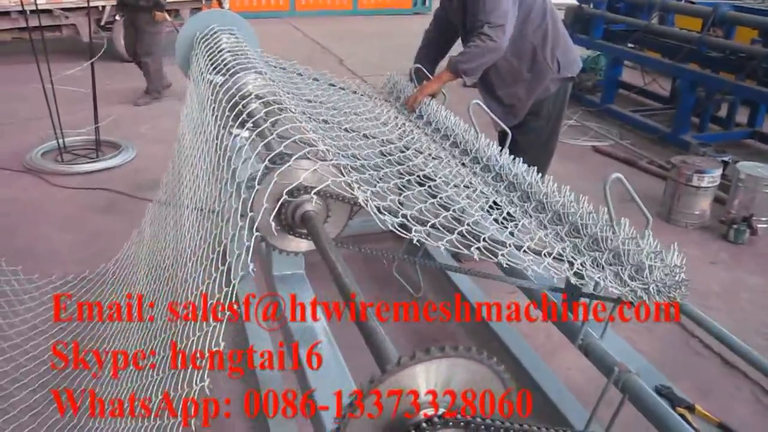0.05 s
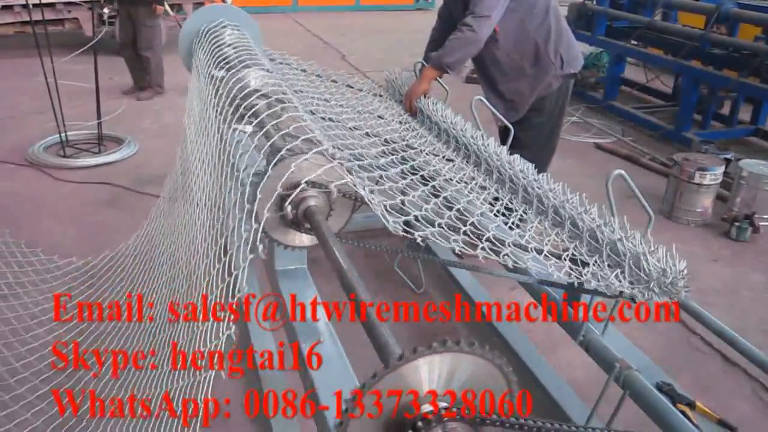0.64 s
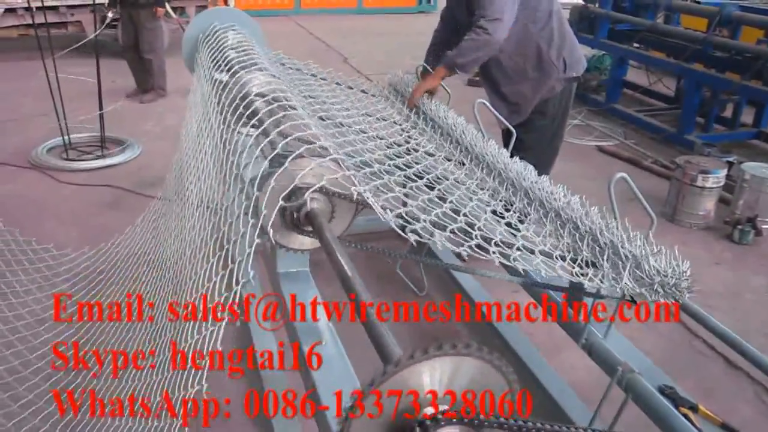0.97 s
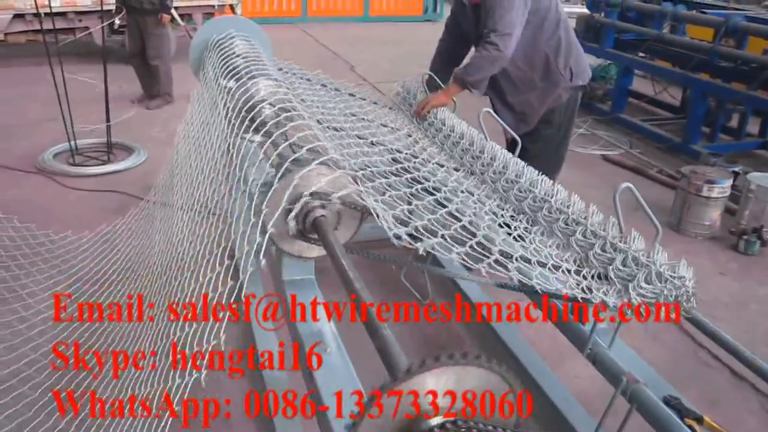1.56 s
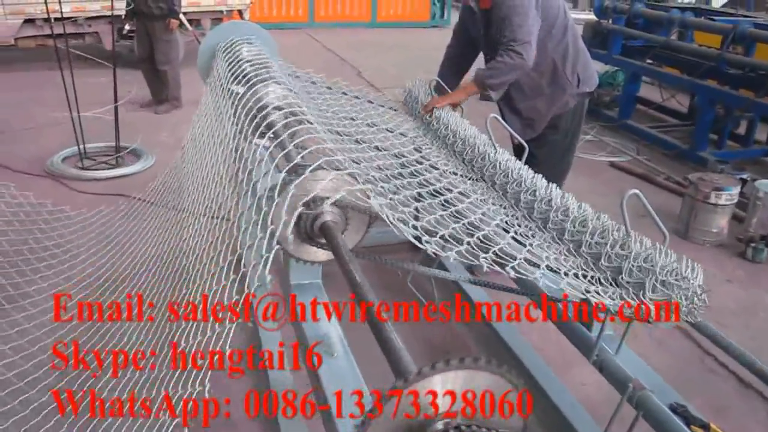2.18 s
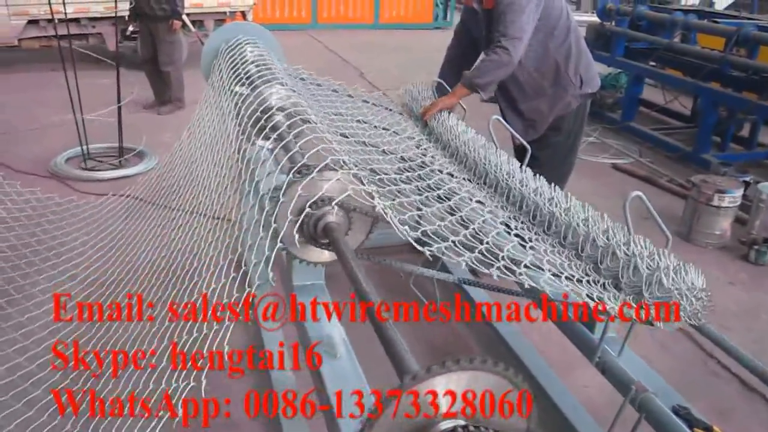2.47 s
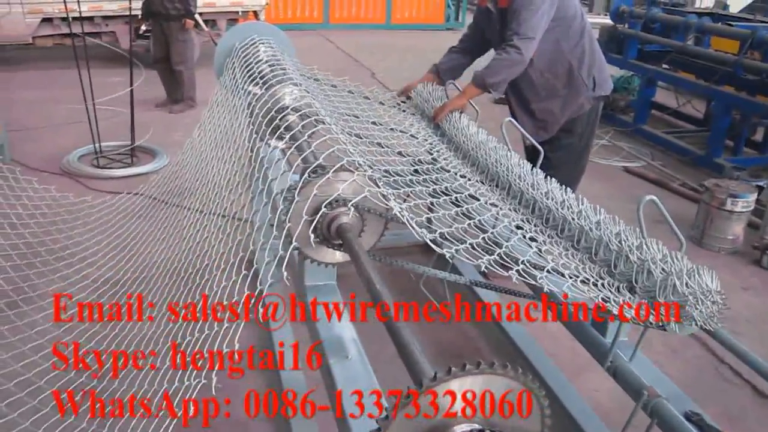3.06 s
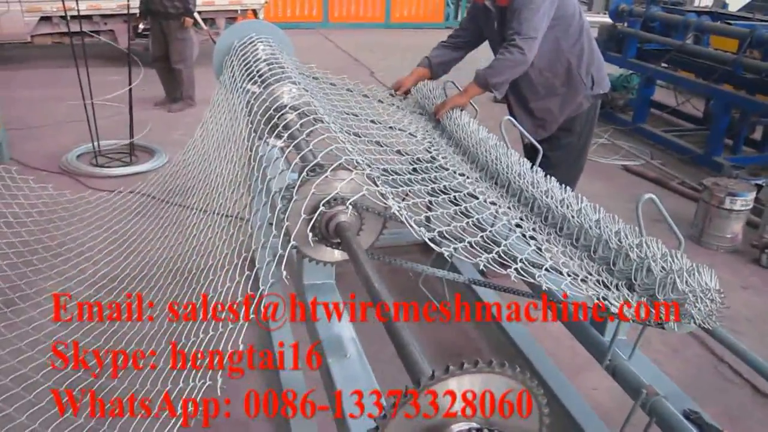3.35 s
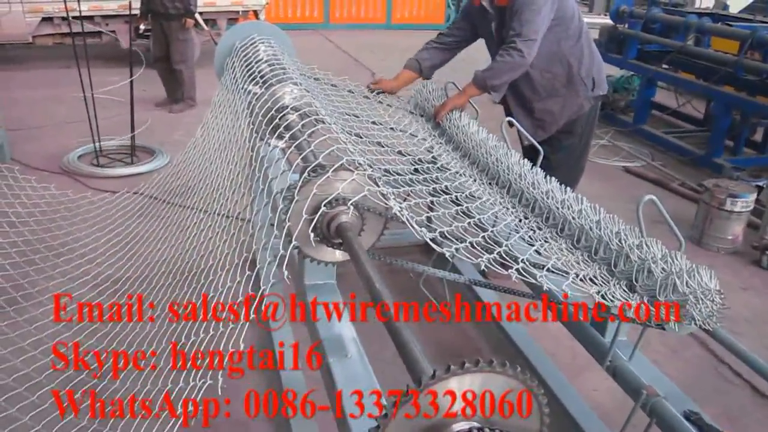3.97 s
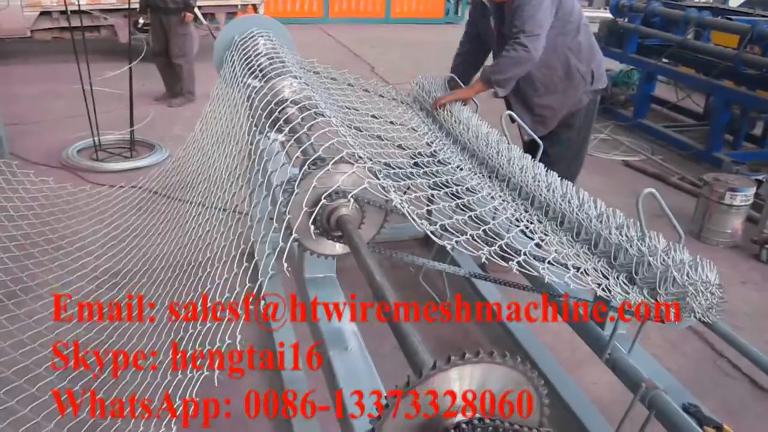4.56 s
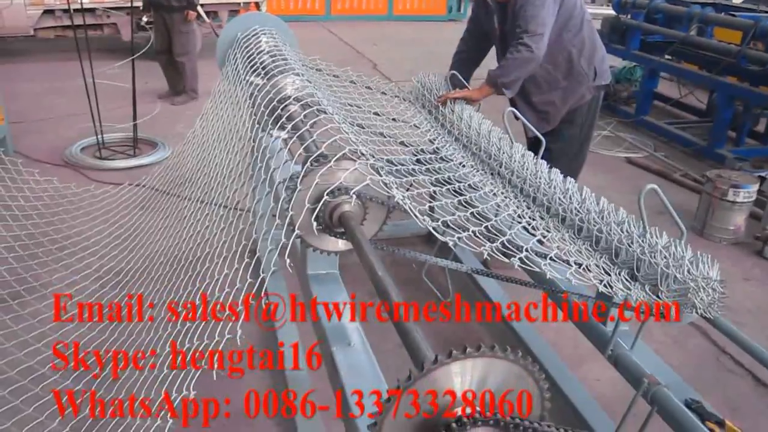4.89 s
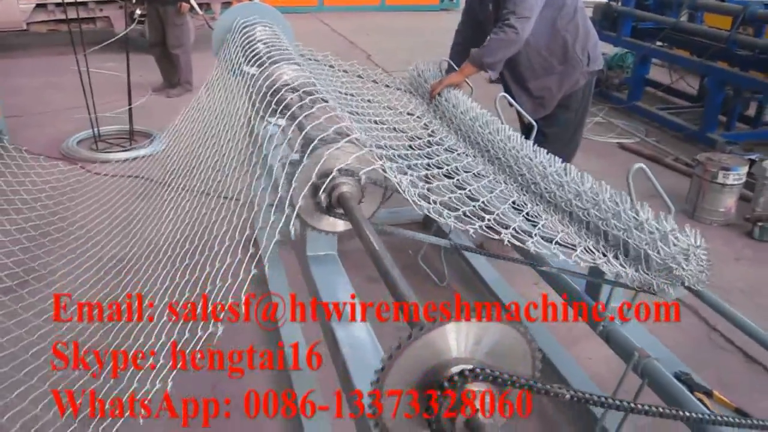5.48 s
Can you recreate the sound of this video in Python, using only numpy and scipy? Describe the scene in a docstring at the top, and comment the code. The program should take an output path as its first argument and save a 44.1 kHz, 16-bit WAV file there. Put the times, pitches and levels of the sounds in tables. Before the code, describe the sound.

A chain-link mesh machine runs close by in a workshop, its steelwork slightly to the right. Throughout, a motor hum throbs about three times a second over a low drone and a hoarse, repeating rub. Wire scrapes and hisses from the start, with scattered light clacks. Around 0.4 to 0.6 seconds the mesh clashes, rattling and ringing with dull knocks. A drive whine enters at about 0.6 seconds and fades after 1.5. From 1.5 to 1.8 seconds the wire scrapes hard again, crackling, rasping and clashing, and the steel frame rings several times between 1.7 and 2.4 seconds. From about 2 seconds, sharp, bright steel clacks dominate in an even rhythm, six or seven a second, some with a quick rebound, while the scraping drops to a light hiss. A short rasp comes at 4.6 seconds, and the machine is still running at 5.5.

```python
"""Chain-link fence machine at work

Motors hum, the frame drones and a sliding part rubs, in a pattern that returns with each stroke.
Steel parts clack about twice a stroke. For two seconds wire scrapes hard through the machine,
crackling and rasping, while the mesh clashes and sets the steel frame ringing.
The camera stands close by in the workshop, a little to one side."""
import sys
import numpy as np
from scipy import signal
from scipy.fft import rfft, irfft, next_fast_len
from scipy.io import wavfile
from scipy.ndimage import uniform_filter1d, map_coordinates

SR = 44100
rng = np.random.default_rng(int(sys.argv[2]) if len(sys.argv) > 2 else 0)


def bounce(signal):
    """Save signal as a 16-bit WAV file at the path given by the first command-line argument."""
    frames = np.transpose(np.atleast_2d(signal))
    limited = np.clip(frames, -1, 1)
    pcm = np.round(limited * 32767).astype(np.int16)
    wavfile.write(sys.argv[1], SR, pcm)


N = 243873
STROKE_HZ = 10 / 3

# how hard the machine works, driving hum, drone and rub: time_s, load_db
MACHINE_LOAD = [(0, -25), (.11, -26.5), (.24, -26), (.5, -25.5), (.85, -22.5), (1.42, -21), (1.7, -27),
                (1.82, -33), (2.05, -27.5), (2.3, -25.5), (2.8, -30), (3.4, -27), (3.9, -26), (4.35, -22.5),
                (4.58, -27), (4.95, -24.5), (5.15, -26), (5.53, -23)]
# how hard the wire slides: time_s, scrape_db, hiss_db
WIRE_FEED = [(0, -33.5, -44.5), (.28, -36.5, -56), (.37, -30.5, -40), (.58, -23, -44), (.82, -27.5, -43.5),
             (1.05, -27.5, -38.5), (1.46, -28, -38.5), (1.58, -23.5, -44), (1.648, -25.5, -42),
             (1.73, -26.5, -43), (1.84, -35, -46.5), (2.04, -27, -42), (2.36, -32.5, -39),
             (2.7, -39, -47.5), (3.3, -40.5, -49), (4.25, -38, -41), (4.7, -39.5, -45), (5.13, -36.5, -41),
             (5.53, -29, -39)]


def amp(db):
    """Decibels to gain."""
    return 10 ** (np.asarray(db) / 20)


def unit(x):
    """x at rms 1."""
    return x / np.sqrt(np.mean(x ** 2) + 1e-20)


def along(points, hz):
    """Read a curve of (frequency, value) points on a log frequency axis."""
    freqs, values = np.transpose(points)
    return np.interp(np.log(hz + 1), np.log(freqs + 1), values)


def clock():
    """The time of each sample in seconds."""
    return np.arange(N) / SR


def curves(rows):
    """One automation curve for each column after the time."""
    times, *columns = np.transpose(rows)
    return [np.interp(clock(), times, column) for column in columns]


def wobble(rate):
    """A smooth random curve, rate knots a second."""
    return map_coordinates(rng.standard_normal(int(N * rate / SR) + 4), [clock() * rate])


def stroke_wobble(count):
    """A smooth random curve of count knots that is the same in every stroke."""
    position = clock() * STROKE_HZ % 1 * count
    return map_coordinates(rng.standard_normal(count), [position], mode="grid-wrap")


def swell(peak_s, hz=STROKE_HZ):
    """A regular swing between -1 and 1 with a peak at peak_s."""
    return np.cos(2 * np.pi * hz * (clock() - peak_s))


def filtered(x, response):
    """x through a frequency response."""
    size = next_fast_len(N + SR // 2)
    return irfft(rfft(x, size) * response(np.fft.rfftfreq(size, 1 / SR)), size)[..., :N]


def coloured(x, spectrum):
    """x through an EQ curve, at rms 1."""
    return unit(filtered(x, lambda hz: amp(along(spectrum, hz))))


def stereo_noise(lag_ms):
    """White noise: the direct part reaches the right side later, the room's part is diffuse."""
    # direct sound's part of the power: freq_hz, share
    direct_share = [(25, 1), (120, 1), (400, 1), (700, 0.96), (1300, 1), (2600, .62), (5000, 0.54),
                    (10000, 0.48), (15000, .3)]
    direct, room = rng.standard_normal(N), rng.standard_normal((2, N))
    share = lambda hz: np.clip(along(direct_share, hz), 0, 1)
    delay = lambda hz: np.exp(np.array([[1j], [-1j]]) * np.pi * hz * lag_ms / 1000)
    near = filtered(direct, lambda hz: np.sqrt(share(hz)) * delay(hz))
    return near + filtered(room, lambda hz: np.sqrt(1 - share(hz)))


def cyclic(x, share):
    """Noise x with a share of its power repeating exactly from stroke to stroke."""
    looped = x[:, np.arange(N) % round(SR / STROKE_HZ)]
    return np.sqrt(share) * looped + np.sqrt(1 - share) * np.roll(x, N // 2, axis=1)


def patchy(x, depth_db, bins):
    """x at rms 1, its colour shifting in patches every few hundredths of a second."""
    spectra = signal.stft(x, nperseg=512)[2]
    patches = uniform_filter1d(rng.standard_normal(spectra.shape[1:]), bins, axis=0)
    patches = uniform_filter1d(patches, size=6, axis=1)
    gain = amp(depth_db * np.clip(unit(patches), -2, 2))
    return unit(signal.istft(spectra * gain, nperseg=512)[1][:, :N])


def blow(peak_s, rise_s, t60, ring_db, ring_t60):
    """Envelope of a contact: grinds up to its peak, drops, and leaves a weaker ring."""
    first, last = max(0, int((peak_s - .05) * SR)), min(N, int((peak_s + .4) * SR))
    t = np.arange(first, last) / SR - peak_s
    after, ring = np.maximum(t, 0), min(amp(ring_db) ** 2, 1)
    attack = amp(-10 * (np.minimum(t, 0) / max(rise_s, 1e-4)) ** 2)
    fall = np.sqrt((1 - ring) * amp(-120 * after / t60) + ring * amp(-120 * after / ring_t60))
    return np.pad(attack * fall, (first, N - last))


def pings(times, level_db, low_hz, high_hz, t60, spread_db):
    """Short lengths of wire ring, each with its own pitch, strength and stereo phase."""
    pitch, strength, left_phase, offset = rng.random((len(times), 4)).T
    hz = low_hz * (high_hz / low_hz) ** pitch
    t = np.arange(SR // 10) / SR
    start_db = level_db + spread_db * (strength - 1)
    envelope = amp(start_db[:, None] - 60 * t / t60) * (1 - np.exp(-t / .0004))
    where = (np.round(times * SR).astype(int)[:, None] + np.arange(len(t))).ravel()
    sides = [envelope * np.sin(2 * np.pi * (hz[:, None] * t + phase[:, None]))
             for phase in (left_phase, left_phase + offset * hz / high_hz)]
    return np.array([np.bincount(where, side.ravel(), N)[:N] for side in sides])


def motor_hum():
    """Mains hum follows the load, throbs and flutters; moving parts sway it with each stroke."""
    # main hum tones, throbbing once (slow) and twice (fast) a stroke:
    # pitch_hz, level_db re load, slow_depth, slow_peak_s, fast_depth, fast_peak_s
    hum_tones = [(400, -1, 0.27, 0.16, 0.29, 0.096), (200, -8, 0.23, 0.2, 0.29, 0.067)]
    # brief surges and sags in every stroke: offset_s, gain_db, width_s
    surges = [(.102, 1.5, .008), (.155, 2, .008), (.18, -3, .009), (.244, 3.5, .009)]
    # weaker hum tones and how the stroke moves them: pitch_hz, level_db, swing_rad, swell_db
    overtones = [(57, -54, .3, 0), (108.6, -45, .3, 0), (320, -46, .2, 0), (536.7, -49, .5, 0),
                 (600, -52, .4, 0), (800, -43, .5, -2.5), (1006.7, -44.5, 2.6, 4.5), (1200, -49, .6, -1)]
    t = clock()
    load_db, = curves(MACHINE_LOAD)
    sway_rad = .28 * swell(peak_s=.07, hz=2 * STROKE_HZ) + .34 * swell(peak_s=.248)
    sway_rad += .12 * stroke_wobble(count=16) + .06 * wobble(18)
    stereo_rad = .014 * np.array([[1], [-1]])
    flutter = .17 * swell(peak_s=.023, hz=7 * STROKE_HZ)
    stroke_s = t % (1 / STROKE_HZ)
    surge_db = sum(db * np.exp(-((stroke_s - s) / width) ** 2) for s, db, width in surges)
    hum, gains = np.zeros((2, N)), []
    for hz, db, slow, slow_s, fast, fast_s in hum_tones:
        rough_db = .9 * (stroke_wobble(count=30) + wobble(22))
        throb = 1 + slow * swell(slow_s) + fast * swell(fast_s, 2 * STROKE_HZ) + flutter
        gain = amp(load_db + db + surge_db + rough_db) * np.maximum(throb, .2)
        hum += gain * np.sin(2 * np.pi * hz * t + sway_rad + stereo_rad)
        gains.append(gain)
    lead_db = 20 * np.log10(gains[0])
    follow_db = .5 * (lead_db - lead_db.mean())  # the weaker tones ride on the loudest
    stroke = swell(peak_s=.11)
    for hz, db, swing_rad, swell_db in overtones:
        phase = 2 * np.pi * (hz * t + rng.random()) + swing_rad * stroke + .35 * stroke_wobble(count=22)
        rough_db = 2.2 * stroke_wobble(count=24) + 1.8 * wobble(8)
        hum += amp(db + swell_db * stroke + follow_db + rough_db) * np.sin(phase)
    return np.sqrt(2) * hum


def frame_drone():
    """The frame drones with the load and the wire's drag, alike in each stroke, over a rumble."""
    # the frame's low-mid resonance: freq_hz, gain_db
    drone_eq = [(70, -55), (120, -31), (155, 2.5), (250, 3), (430, 7.5), (560, -2.5), (950, -0.5),
                (1400, -14), (3000, -14), (8000, -26.5)]
    # the low end under it: freq_hz, gain_db
    rumble_eq = [(20, -28), (38, -7), (50, -7), (66, -1.5), (80, -15), (95, -12), (112, -2), (140, -1.5),
                 (200, -47), (400, -49)]
    # the rumble's rise and fall: time_s, level_db
    rumble_levels = [(0, -38), (.35, -49), (.93, -34), (1.55, -42.5), (3.3, -49), (4.3, -46.5), (4.7, -40),
                     (5.2, -49), (5.4, -37)]
    load_db, = curves(MACHINE_LOAD)
    scrape_db, _ = curves(WIRE_FEED)
    rumble_db, = curves(rumble_levels)
    drone_db = -31.5 + .96 * (load_db - load_db.mean()) + .26 * (scrape_db - scrape_db.mean())
    drone_db += .35 * swell(peak_s=.13)
    drone = amp(drone_db) * coloured(cyclic(stereo_noise(lag_ms=.028), share=.8), drone_eq)
    rumble = amp(rumble_db + 1.7 * wobble(8.3)) * coloured(stereo_noise(lag_ms=.01), rumble_eq)
    return drone + rumble


def rubbing():
    """A sliding part rubs once a stroke, much the same each time, louder under load."""
    # a narrow, hoarse band of friction: freq_hz, gain_db
    rub_eq = [(600, -23), (850, -10), (950, 6.5), (1040, 2.5), (1130, 1), (1250, 5), (1450, -18),
              (2200, -44)]
    load_db, = curves(MACHINE_LOAD)
    rub_db = -39.5 + 1.17 * (load_db - load_db.mean()) + 2.5 * swell(peak_s=.12)
    return amp(rub_db) * coloured(cyclic(stereo_noise(lag_ms=.026), share=.65), rub_eq)


def sliding_wire():
    """Wire catches in countless tiny slips: it scrapes, hisses and sizzles, and links jingle."""
    # coarse midrange scrape: freq_hz, gain_db
    scrape_eq = [(200, -14), (450, -5.5), (700, 0), (1200, -1.5), (1900, 0.5), (2700, -4.5), (4000, -9.5),
                 (5500, -15), (7500, -20), (10000, -20.5), (16000, -55)]
    # gritty treble hiss: freq_hz, gain_db
    hiss_eq = [(1500, -19), (3500, 8), (5500, 5), (7500, -0.5), (9500, -0.5), (11300, 0.5), (13000, -9),
               (15000, -34), (16000, -32)]
    # top-end sizzle: freq_hz, gain_db
    sizzle_eq = [(5000, -25), (8500, -12), (10000, 0), (11500, 3), (12500, -1.5), (14500, -13),
                 (15500, -26)]
    scrape_db, hiss_db = curves(WIRE_FEED)
    slips = patchy(stereo_noise(lag_ms=.075), depth_db=2.2, bins=2) * amp(.36 * wobble(400))
    scrape = amp(scrape_db + 2.5) * coloured(slips, scrape_eq)
    grit = amp(.61 * wobble(900) + 2.1 * wobble(70))
    fine_slips = patchy(stereo_noise(lag_ms=.11), depth_db=5.5, bins=2) * grit
    hiss = amp(hiss_db + 6) * coloured(fine_slips, hiss_eq)
    slack_db = np.minimum(scrape_db + 24, 0)  # ducks sizzle and jingle unless the wire runs hard
    sizzle = amp(hiss_db + slack_db + 8.5) * coloured(stereo_noise(lag_ms=.092) * grit, sizzle_eq)
    touches = rng.integers(N, size=700)
    touch_db = (scrape_db + slack_db)[touches] + 2
    jingle = pings(touches / SR, touch_db, low_hz=1000, high_hz=4200, t60=.15, spread_db=16)
    return scrape + hiss + sizzle + jingle


def link_crackle(snaps_per_s=170):
    """Single links snap past each other in tiny bright ticks, loudest while the wire runs hard."""
    scrape_db, hiss_db = curves(WIRE_FEED)
    snaps = rng.integers(N, size=int(snaps_per_s * N / SR))
    level_db = hiss_db + 19.5 + np.minimum(scrape_db + 29, 0)
    return pings(snaps / SR, level_db[snaps], low_hz=8800, high_hz=13200, t60=.007, spread_db=18)


def steel_clacks():
    """Steel parts meet with a sharp crack and a bright tick on a crunchy body; some rebound."""
    # steel impacts: peak_s, tick_db, body_db, rise_s, rebound_gap_s (0 for none)
    hits = [(.158, -30.5, -35, 0.0026, 0), (.6693, -36, -38, .005, 0), (.7604, -25.5, -20, 0.0058, 0),
            (1.1245, -31, -22, 0.0055, 0), (1.4345, -25, -34, .004, 0), (1.4748, -22, -32, 0.0032, 0),
            (1.546, -16.5, -26, 0.0042, 0), (1.604, -19, -22, 0.0042, .024),
            (1.7826, -24, -23.5, 0.0059, 0), (1.911, -16.5, -21.5, .0015, 0), (2.086, -20, -18, 0.0027, 0),
            (2.215, -13.5, -17.5, 0.0039, 0), (2.378, -14.5, -14.5, 0.0044, 0),
            (2.5176, -10, -18.5, 0.0024, .022), (2.6709, -12.5, -15.5, 0.0018, 0),
            (2.8232, -14.5, -18.5, 0.0026, .021), (2.9876, -18, -16.5, 0.0062, 0),
            (3.1263, -19, -21, 0.0027, .028), (3.182, -34, -28, .003, 0), (3.304, -22.5, -19.5, 0.016, 0),
            (3.435, -16, -19, 0.0044, .031), (3.5917, -16.5, -16, 0.0054, 0),
            (3.743, -28, -22.5, 0.0061, 0), (3.7803, -25, -22, 0.0024, 0), (3.9024, -26, -19.5, .0015, 0),
            (4.03, -19, -20, 0.0056, .031), (4.191, -15.5, -14.5, 0.006, .017),
            (4.3522, -17, -19, 0.0051, 0), (4.493, -16, -13.5, 0.0072, 0),
            (4.632, -14.5, -19, 0.0032, .054), (4.8075, -17.5, -12.5, 0.003, 0),
            (4.951, -16, -20, 0.0046, .018), (5.113, -19, -15.5, 0.014, 0),
            (5.2457, -19.5, -20, .007, .031), (5.412, -28.5, -21.5, 0.0068, 0)]
    # the sharp transient: freq_hz, gain_db
    crack_eq = [(1500, -3), (5000, -24), (10500, 18), (13000, 10), (15000, 4), (16000, -14)]
    # the bright steel tick: freq_hz, gain_db
    tick_eq = [(3000, -13.5), (6500, -30), (9000, 1), (10700, 6.5), (12200, -5.5), (14500, -9.5),
               (16000, -30)]
    # the broad body: freq_hz, gain_db
    body_eq = [(300, -21), (1100, -14), (1900, -1), (2700, -4), (3900, -1), (5300, 0.5), (7000, -1.5),
               (9000, -7), (16000, -32)]
    # a rebound is duller and softer-edged
    rebounds = [(s + gap_s, tick_db - 7.5, body_db, .0091)
                for s, tick_db, body_db, _, gap_s in hits if gap_s > 0]
    crack_power, tick_power, body_power = np.zeros((3, N))
    for s, tick_db, body_db, rise_s, *_ in hits + rebounds:
        crack_power += (amp(tick_db) * blow(s - .0005, .0006, t60=.008, ring_db=-12, ring_t60=.05)) ** 2
        tick_power += (amp(tick_db) * blow(s, rise_s, t60=.024, ring_db=-7, ring_t60=.1)) ** 2
        body_power += (amp(body_db) * blow(s, rise_s, t60=.032, ring_db=-4, ring_t60=.11)) ** 2
    crack = np.sqrt(crack_power) * coloured(stereo_noise(lag_ms=.1), crack_eq)
    glint = patchy(stereo_noise(lag_ms=.1), depth_db=4, bins=3)
    tick = np.sqrt(tick_power) * coloured(glint, tick_eq)
    crunch = patchy(stereo_noise(lag_ms=.095), depth_db=2.5, bins=3) * amp(1.6 * wobble(700))
    body = np.sqrt(body_power) * coloured(crunch, body_eq)
    return amp(-6) * crack + amp(-2) * tick + amp(-1.5) * body


def mesh_clashes():
    """Links tumble against each other: the wires ring, the sheet rattles, the roller knocks."""
    # tumbles of the mesh: peak_s, ring_db, rattle_db, knock_db, t60_s
    clashes = [(.371, -20.5, -24, -36, 0.22), (.402, -36, -23, -19, 0.36), (0.427, -38, -34, -21, .25),
               (.495, -19, -23.5, -34, 0.35), (.582, -14, -27, -44, 0.28), (.628, -25, -24, -37, 0.17),
               (1.456, -28, -22.5, -39, 0.35), (1.554, -14, -20.5, -29, 0.26), (1.582, -18, -23, -35, 0.3),
               (1.6603, -25, -16, -40, 0.049), (1.704, -22, -18, -34, 0.15),
               (1.72, -20.5, -10.5, -18, 0.054), (2.028, -21, -20, -30, 0.44), (2.305, -31, -23, -38, 0.4),
               (2.349, -42, -30, -37, 0.22)]
    # wire resonances, adding in power: pitch_hz, width_hz, level_db
    wire_modes = [(3330, 120, -7), (3900, 400, -10), (4300, 350, -5), (4686, 70, 2.5), (4775, 70, 2.5),
                  (4950, 300, -5), (5400, 400, -11), (6240, 400, -9), (7000, 500, -11)]
    # the sheet's midrange rattle: freq_hz, gain_db
    rattle_eq = [(400, -21), (900, 2.5), (1400, 7), (2000, 4), (2800, 1), (4000, -12), (7000, -15),
                 (16000, -27)]
    # the roller's dull knock: freq_hz, gain_db
    knock_eq = [(200, -23), (500, 7.5), (660, 8), (800, 7.5), (1100, -39), (3000, -65)]
    # a longer tumble also builds up more slowly
    envelopes = np.array([blow(s, rise_s=.046 * t60, t60=.033, ring_db=-.5, ring_t60=t60)
                          for s, *_, t60 in clashes])
    powers = amp(np.array(clashes)[:, 1:4].T) ** 2
    ring, rattle, knock = np.sqrt(powers @ envelopes ** 2)
    resonance = lambda f: np.sqrt(sum((amp(db) / (1 + (2 * (f - hz) / width) ** 2)) ** 2
                                      for hz, width, db in wire_modes))
    links = patchy(stereo_noise(lag_ms=.07), depth_db=2.5, bins=2) * amp(2.2 * wobble(500))
    wires = ring * unit(filtered(links, resonance))
    sheet = rattle * coloured(links, rattle_eq)
    roller = knock * coloured(stereo_noise(lag_ms=.027), knock_eq)
    return amp(-2) * wires + sheet + amp(-2) * roller


def drive_whine(pitch_hz=638.5, on_s=.56, off_s=1.54, rise_db_per_s=190, fall_db_per_s=30):
    """The wire drive whines while it feeds, then fades as it runs down."""
    t = clock()
    fade_db = rise_db_per_s * np.maximum(on_s - t, 0) + fall_db_per_s * np.maximum(t - off_s, 0)
    peak = np.sqrt(2) * amp(-31.5 - fade_db + 1.2 * wobble(18))
    return peak * np.sin(2 * np.pi * pitch_hz * t + .5 * wobble(12))


def wire_rasps():
    """Wire drags briefly over a steel edge, shuddering."""
    # short drags: peak_s, level_db, rise_s, t60_s
    drags = [(1.6595, -16.5, .0007, .06), (1.719, -22, .01, .08), (2.64, -35, .008, .1),
             (4.629, -19.5, .006, .22)]
    # the edge's upper-mid bite: freq_hz, gain_db
    edge_eq = [(900, -28), (1800, -10), (2300, -3), (2800, 0), (3300, 0), (4100, -8), (5500, -18),
               (9000, -35)]
    force = sum(amp(db) * blow(s, rise_s, t60=.19, ring_db=-2.5, ring_t60=t60)
                for s, db, rise_s, t60 in drags)
    shudder = stereo_noise(lag_ms=.085) * amp(1.9 * wobble(270))
    return force * coloured(shudder, edge_eq)


def frame_clangs():
    """The mesh strikes the steel frame, which rings on, a little differently each time."""
    # strikes on the frame: start_s, level_db
    strikes = [(1.716, -30), (2.012, -31), (2.288, -28.5), (2.332, -29)]
    # the frame's ringing modes: pitch_hz, level_db, t60_s
    frame_modes = [(754, -2, .4), (1007, -1, .35), (1125, -4, .35), (1297, 0, .35), (1631, 0, .3),
                   (1815, 1, .35), (1940, -8, .3), (2196, -3, .25), (2509, -9, .25)]
    out = np.zeros((2, N))
    for start_s, db in strikes:
        t = np.maximum(clock() - start_s, 0)
        attack = 1 - np.exp(-t / .003)
        for hz, mode_db, t60 in frame_modes:
            phase = 2 * np.pi * (hz * t + rng.random()) + rng.normal(0, .3, (2, 1))
            out += amp(db + mode_db + rng.normal(0, 2) - 60 * t / t60) * attack * np.sin(phase)
    return out


def scene():
    """The hum fills the room; the steelwork sits a little to the right."""
    # the steelwork's pan: freq_hz, left_minus_right_db
    pan = [(400, 0), (1100, -1.5), (2200, -1.7), (4500, -0.1), (9000, -3), (12000, -0.5)]
    steel = sliding_wire() + link_crackle() + steel_clacks() + mesh_clashes()
    steel += frame_clangs() + wire_rasps() + rubbing()
    panned = filtered(steel, lambda hz: amp(along(pan, hz) * np.array([[.5], [-.5]])))
    return motor_hum() + drive_whine() + frame_drone() + panned


def record(dry):
    """The camera has a narrow notch in the treble and keeps nothing above its band limit."""
    notch_hz, half_width_hz, top_hz = 8250, 370, 15800
    notch = lambda hz: (hz - notch_hz) ** 2 / ((hz - notch_hz) ** 2 + half_width_hz ** 2)
    return filtered(dry, lambda hz: notch(hz) * (hz < top_hz))


dry = scene()
out = record(dry)
bounce(out)
```